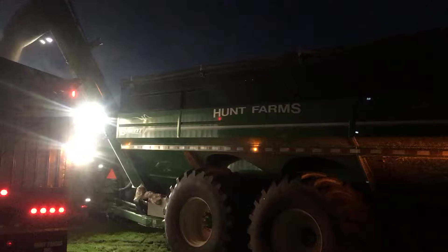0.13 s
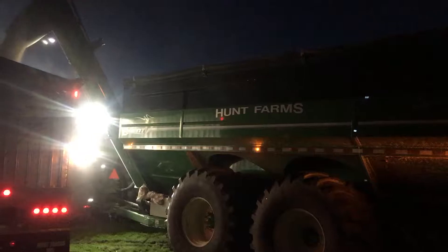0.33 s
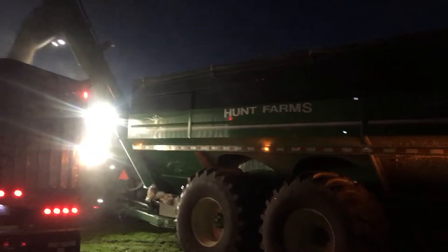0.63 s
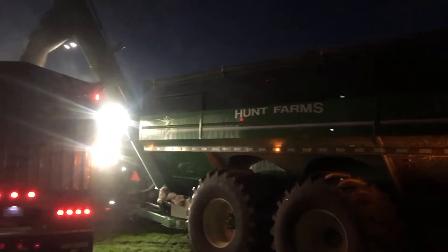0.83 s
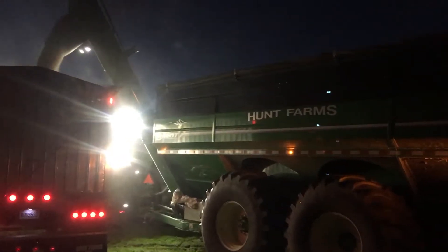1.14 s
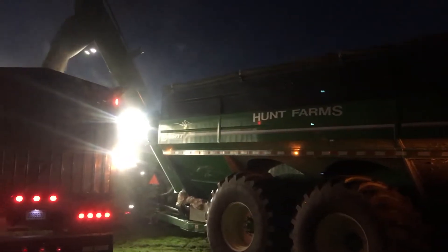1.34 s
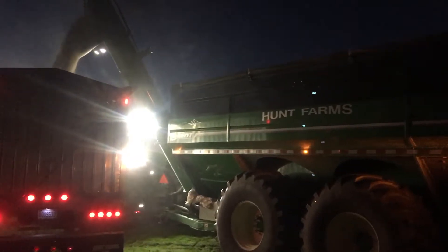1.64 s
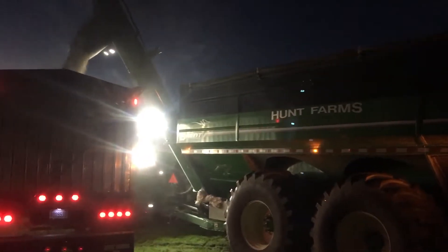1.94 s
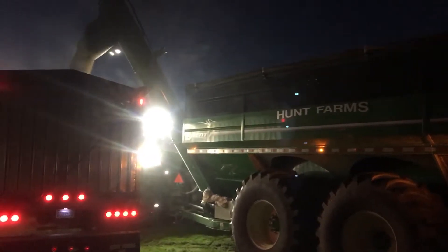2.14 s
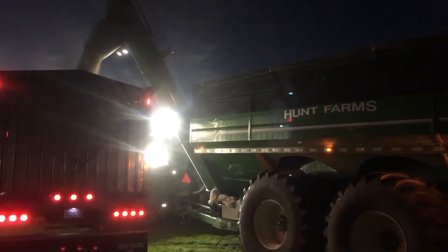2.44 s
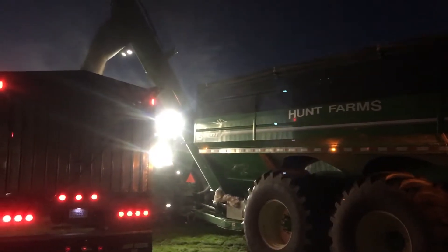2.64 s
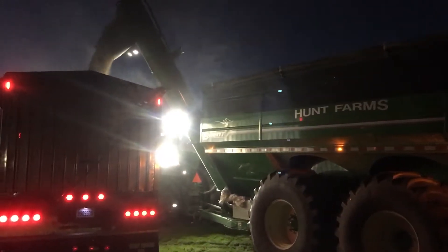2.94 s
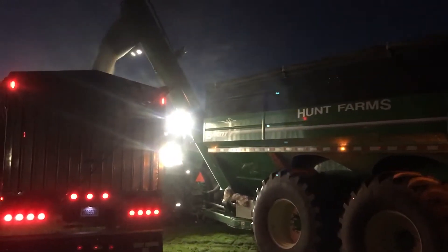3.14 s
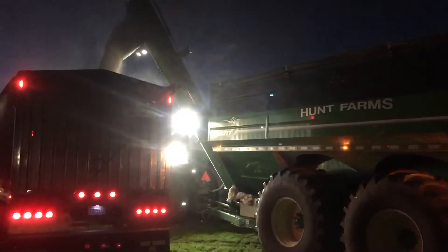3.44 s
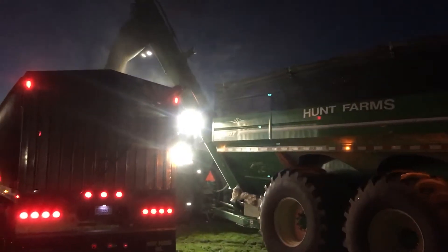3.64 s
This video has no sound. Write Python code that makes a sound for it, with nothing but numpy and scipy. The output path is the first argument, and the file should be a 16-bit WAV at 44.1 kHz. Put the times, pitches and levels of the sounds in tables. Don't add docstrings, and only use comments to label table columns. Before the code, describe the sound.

Grain streams loudly into a steel trailer, a dense hissing rattle, with a pulsing auger roar, faint gear whine and diesel drone behind; light wind buffets one small outdoor microphone.

```python
import sys
import numpy as np
from scipy import signal
from scipy.fft import rfft, irfft, next_fast_len
from scipy.io import wavfile
from scipy.ndimage import uniform_filter1d, map_coordinates

SR = 44100
rng = np.random.default_rng(int(sys.argv[2]) if len(sys.argv) > 2 else 0)


def volts(x):
    e = np.asarray(x, float) / 20
    return 10 ** e


def master(y):
    cut = np.clip(np.atleast_2d(y).T, -1, 1)
    pcm = np.round(cut * 32767)
    wavfile.write(sys.argv[1], SR, pcm.astype(np.int16))


N = 166698

# t/s, level/dB
BREEZE = [
    (.12, -32),
    (.4, -36),
    (.8, -36),
    (1.3, -34),
    (1.7, -41),
    (2.2, -34.5),
    (2.55, -41),
    (2.9, -32.5),
    (3.4, -33.5),
    (3.78, -38),
]
# f/Hz, level/dB
BUFFET = [(20, -40), (32, -17), (45, -3), (70, 0), (110, -1.5), (140, -7), (250, -30), (500, -53)]
# t/s, level/dB, pitch f/Hz, length t/s
LOW_THUMPS = [(0.211, -26, 80, 0.058), (0.343, -24.5, 68, 0.081), (0.484, -24, 106, .03),
              (.646, -24, 72.5, 0.044), (.762, -28, 86, .05), (1.04, -31, 81, .05), (1.239, -27, 84.4, 0.065),
              (1.385, -27.5, 89, 0.1), (1.667, -28, 70.5, 0.07), (1.905, -35, 81.5, 0.037),
              (2.346, -27, 59.6, .04), (2.896, -30, 85, .04), (3.099, -28, 70.6, .04), (3.238, -29, 103, 0.047),
              (3.327, -28, 89, 0.045), (3.544, -26, 83.6, .04), (0.421, -33.5, 124, 0.16)]
ENGINE_ORDERS = [3, 6, 8, 9, 10, 19]
ENGINE_ORDERS_DB = [-42.5, -50, -46.5, -55.5, -41.5, -43.5]
# f/Hz, level/dB
EXHAUST = [(30, -28), (60, -7), (90, -1.5), (130, -3.5), (200, 0.5), (300, -9), (450, -7.5), (900, -35)]
GEAR_HZ = [338.2, 667.0, 676.5]
GEAR_DB = [-46, -38, -39.5]
# f/Hz, width f/Hz, level/dB
TUBE = [(636, 64, -1.5), (668, 16, -2), (771, 115, -2.5), (880, 44, -8.5), (945, 40, 1), (995, 60, -6.5),
        (1110, 100, -5.5), (1220, 57, -6), (1320, 51, -12), (1775, 280, -5), (319, 92, -10.5)]
# f/Hz, level/dB
TUBE_COLOUR = [(60, -40), (150, 5.5), (380, -1), (510, -3), (590, -1), (1300, -1.5), (1400, -2),
               (2400, -10)]
# t/s, level/dB
LOAD = [
    (.12, -25.5),
    (.6, -25),
    (1.1, -24.5),
    (1.6, -25.5),
    (2.2, -24.5),
    (2.8, -25),
    (3.3, -25.5),
    (3.78, -25.5),
]
# f/Hz, width f/Hz, level/dB
WALL = [(2605, 1030, -10.5), (3244, 196, -4), (3430, 184, -0.5), (3540, 250, -3), (4220, 810, -10),
        (5600, 2200, -19)]
# f/Hz, level/dB
WALL_COLOUR = [(1200, -27), (2000, -3), (2300, 0), (4600, -1.5), (4900, -5.5), (5400, -4), (7500, -15.5),
               (11000, -42)]
# t/s, level/dB
FLOW = [(.12, -16.5), (.35, -15), (.55, -16), (.7, -15), (.9, -16.5), (1.1, -15.5), (1.3, -16), (1.45, -15),
        (1.8, -16.5), (2.1, -16), (2.45, -15.5), (2.75, -16.5), (3.0, -15), (3.3, -16.5), (3.55, -16),
        (3.78, -16.5)]
# f/Hz, level/dB
DUST = [(4500, -30), (6500, -1), (7600, -5.5), (8800, -5), (10000, -11.5), (11500, -13), (14000, -21),
        (15800, -27)]
# f/Hz, level/dB
PORT = [(8000, 0), (9900, 1), (10450, -4.5), (10900, -0.5), (14000, 0), (15700, -5)]
# t/s, lowest f/Hz, highest f/Hz, level/dB
WIDE = [(.186, 8100, 9900, -50), (.186, 13700, 15750, -62), (1.022, 4500, 7100, -35),
        (1.022, 10300, 12600, -55), (1.022, 14300, 15750, -63), (1.649, 5200, 6500, -38),
        (1.649, 10900, 12600, -56), (2.299, 6200, 7700, -44), (2.299, 10900, 12600, -56),
        (3.019, 5500, 7100, -40), (3.158, 6900, 9200, -46), (3.251, 4200, 5400, -32),
        (3.669, 13000, 14600, -62)]

SHAFT_HZ = 30.06
TURN_HZ, FIRST_TURN_S = 8.52, .12


def unit(x):
    return x / np.sqrt(np.mean(x ** 2) + 1e-20)


def along(points, hz):
    f, db = np.transpose(points)
    return volts(np.interp(np.log(hz + 1), np.log(f + 1), db))


def curve(rows):
    s, value = np.transpose(rows)
    return np.interp(np.arange(N) / SR, s, value)


def wobble(rate):
    knots = rng.standard_normal(int(N * rate / SR) + 4)
    return map_coordinates(knots, [np.arange(N) * rate / SR])


def filtered(x, response):
    m = next_fast_len(N + SR // 2)
    return irfft(rfft(x, m) * response(np.fft.rfftfreq(m, 1 / SR)), m)[:N]


def body(peaks, colour):
    def response(f):
        power = sum(abs(volts(db) * f * w / (c * c - f * f + 1j * f * w)) ** 2 for c, w, db in peaks)
        gain = along(colour, f) * np.sqrt(power)
        ceps = irfft(np.log(gain + 1e-6))
        ceps[1:len(f) - 1] *= 2
        ceps[len(f):] = 0
        return np.exp(rfft(ceps))
    return response


def patchy(patchy_db, fleck_db):
    z = signal.stft(rng.standard_normal(N + 512), nperseg=512)[2]
    flecks = uniform_filter1d(rng.standard_normal(z.shape), size=5, axis=1)
    patches = uniform_filter1d(rng.standard_normal(z.shape), size=5, axis=0)
    patches = uniform_filter1d(patches, size=10, axis=1)
    gain = volts(patchy_db * unit(patches) + fleck_db * unit(flecks))
    return unit(signal.istft(z * gain, nperseg=512)[1][:N])


def tones(freqs, levels):
    waver_hz, waver_db = 0.38, 0.5
    t = np.arange(N) / SR
    total = 0
    for f, db in zip(freqs, levels):
        loudness = np.sqrt(2) * volts(db + waver_db * wobble(3.95))
        drift = np.cumsum(waver_hz * wobble(3.01)) / SR
        total = total + loudness * np.sin(2 * np.pi * (f * t + drift + rng.random()))
    return total


def breeze():
    t = np.arange(N) / SR
    flutter = filtered(patchy(patchy_db=0.8, fleck_db=.8), lambda f: along(BUFFET, f))
    flutter = volts(1.0 * wobble(17)) * flutter
    ratio = 1.62

    def wave(s, hz):
        return np.sin(2 * np.pi * (hz * (t - s) + rng.random()))

    thumps = 0
    for s, db, hz, long_s in LOW_THUMPS:
        burst = wave(s, hz) + volts(-7.5) * wave(s, hz * ratio) + volts(-12) * wave(s, hz / ratio)
        thumps = thumps + volts(db) * np.exp(-(2 * (t - s) / long_s) ** 2) * burst
    return volts(curve(BREEZE)) * unit(flutter) + 1.16 * thumps


def engine():
    puff, exhaust_db = 0.31, -34.5
    firing = np.cos(2 * np.pi * SHAFT_HZ * ENGINE_ORDERS[0] * np.arange(N) / SR)
    puffs = patchy(patchy_db=1.3, fleck_db=0.4) * (1 + puff * firing)
    roar = unit(filtered(puffs, lambda f: along(EXHAUST, f)))
    return tones(SHAFT_HZ * np.array(ENGINE_ORDERS), ENGINE_ORDERS_DB) + volts(exhaust_db) * roar


def auger():
    auger_db, swell_depth = -22.5, 0.13
    load_db = curve(LOAD)
    turn = np.cos(2 * np.pi * TURN_HZ * (np.arange(N) / SR - FIRST_TURN_S))
    roar = unit(filtered(patchy(patchy_db=0.57, fleck_db=1.0), body(TUBE, TUBE_COLOUR)))
    effort = volts(1.04 * (load_db - load_db.mean()) + .5 * wobble(12))
    swell = (1 + swell_depth * turn) * effort
    return volts(auger_db) * swell * roar + tones(GEAR_HZ, GEAR_DB)


def grain():
    kernels_per_s, kernel_spread_db = 9000, 2.5
    slide_share = 0.63
    dust_db, dust_taps = -41.5, 0.28

    count = int(kernels_per_s * N / SR)
    size = volts(kernel_spread_db * rng.exponential(size=count)) * rng.choice([-1, 1], size=count)
    taps = unit(np.bincount(rng.integers(N, size=count), size, N))
    slide = patchy(patchy_db=0.1, fleck_db=2.5)
    push = np.sqrt(1 - slide_share) * taps + np.sqrt(slide_share) * slide
    rattle = unit(filtered(push, body(WALL, WALL_COLOUR)))

    flow_db = curve(FLOW) + 0.41 * wobble(30.12)
    fizz = patchy(patchy_db=0.0, fleck_db=1.7) + dust_taps * taps
    dust = unit(filtered(fizz, lambda f: along(DUST, f)))
    dust_level = volts(dust_db + 0.44 * (flow_db - flow_db.mean()))
    return volts(flow_db) * rattle + dust_level * dust


def scene():
    air = breeze() + engine() + auger() + grain()
    return np.tile(filtered(air, lambda f: along(PORT, f)), (2, 1))


def low_pass(x):
    return signal.sosfilt(signal.butter(12, 15750, fs=SR, output="sos"), x)


def record(dry):
    start_s, wide_s = .1204, .036
    top, knee = 1.03, 3.5
    t = np.arange(N) / SR
    side = 0
    for s, lo, hi, db in WIDE:
        fade = np.cos(np.pi * np.clip((t - s) / wide_s, -.5, .5))
        band = unit(filtered(rng.standard_normal(N), lambda f: (f > lo) & (f < hi)))
        side = side + volts(db) * fade * band
    x = dry * (t > start_s)
    x = x / (1 + abs(x / top) ** knee) ** (1 / knee)
    mix = x + side * [[1], [-1]]
    return low_pass(mix)


dry = scene()
out = record(dry)
master(out)
```